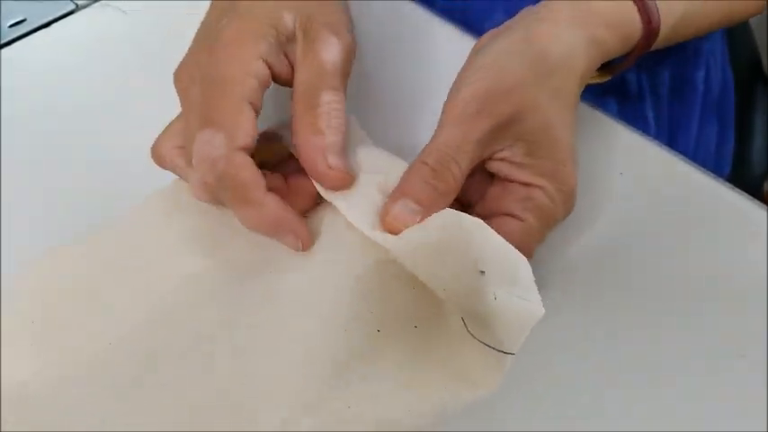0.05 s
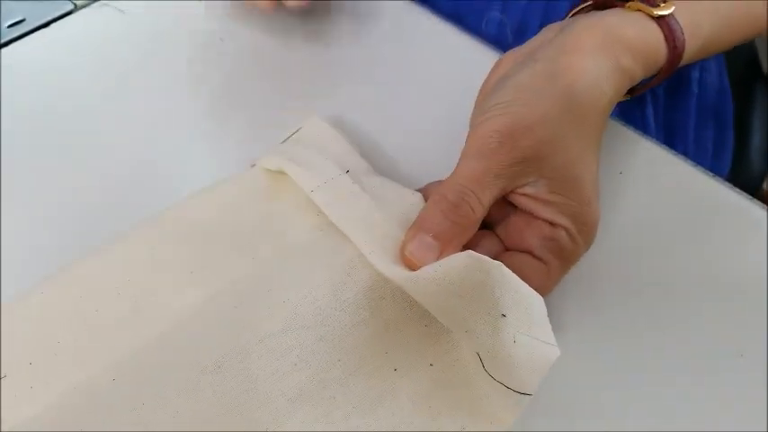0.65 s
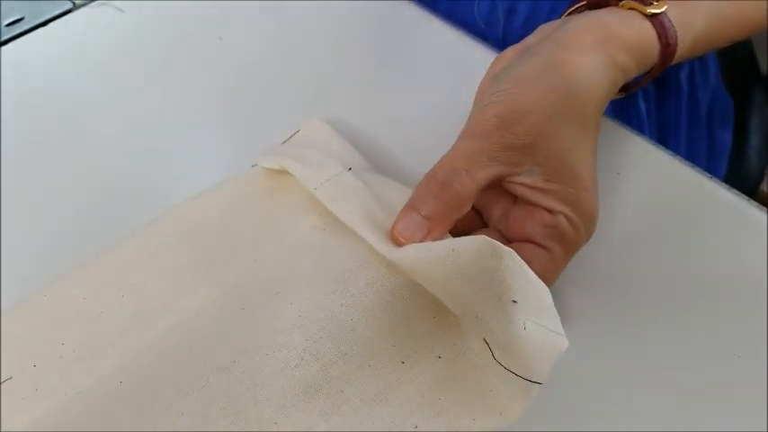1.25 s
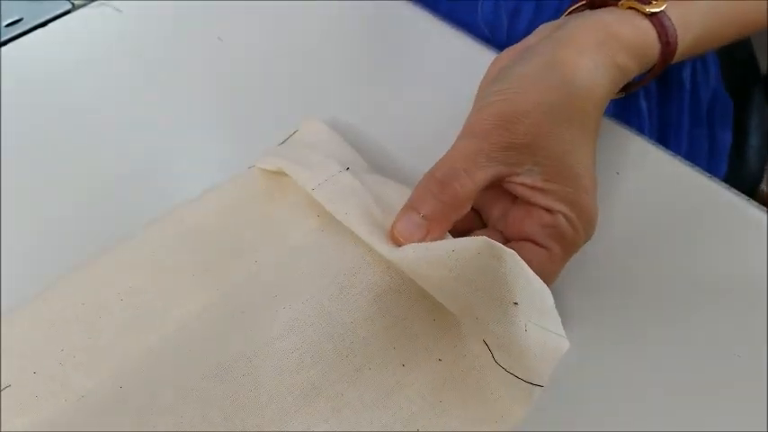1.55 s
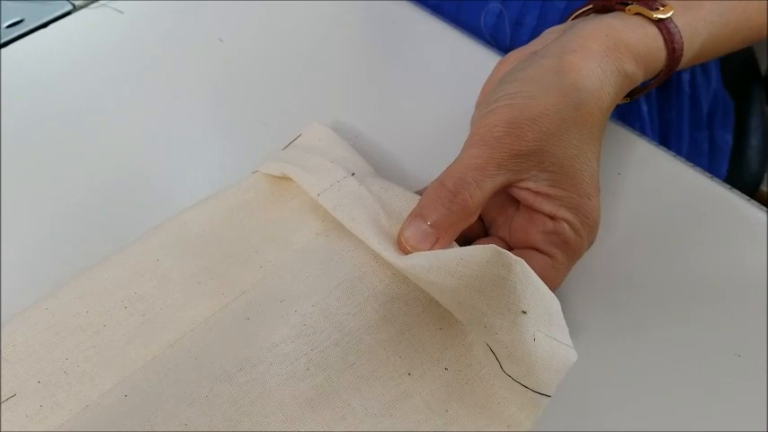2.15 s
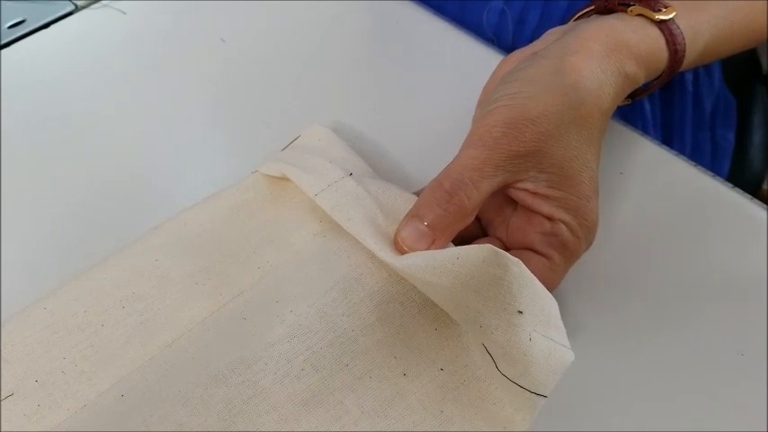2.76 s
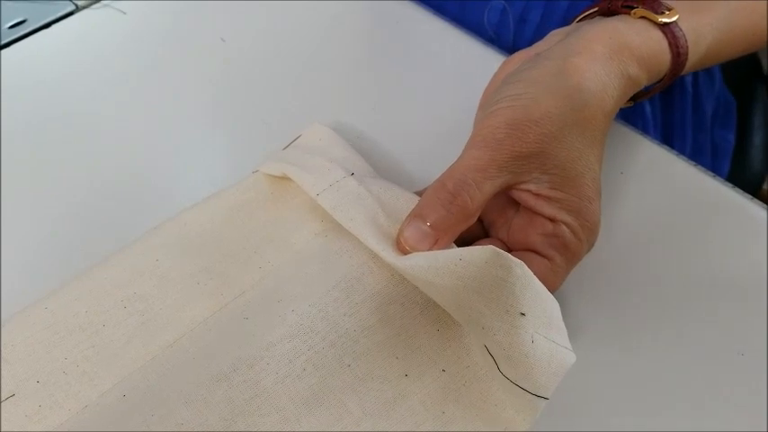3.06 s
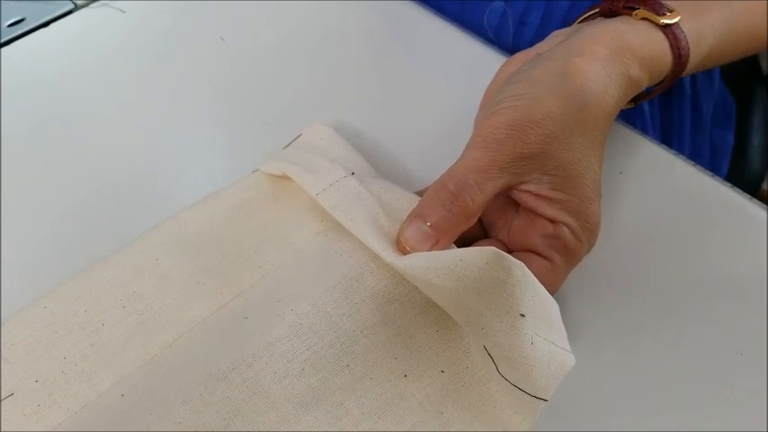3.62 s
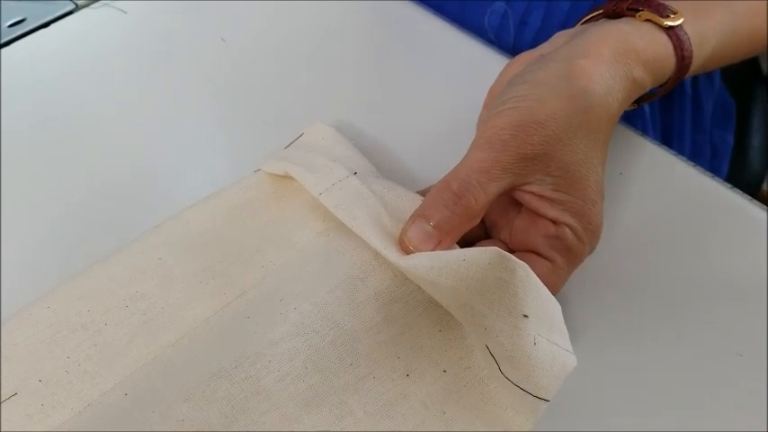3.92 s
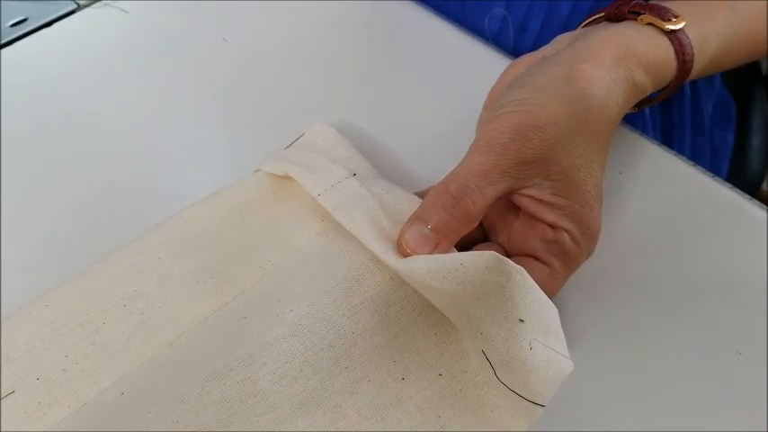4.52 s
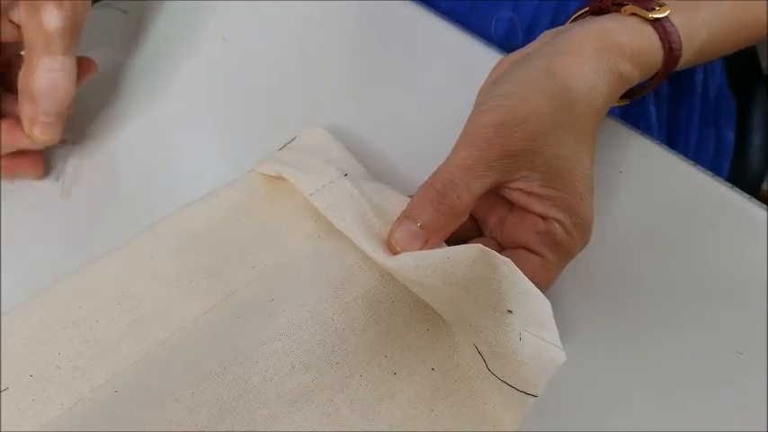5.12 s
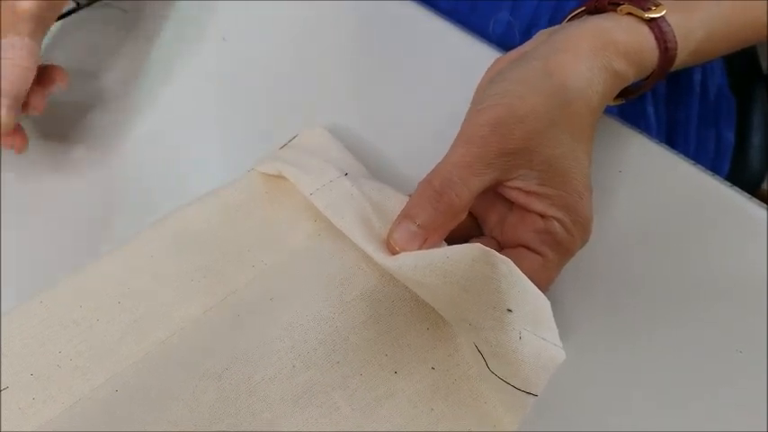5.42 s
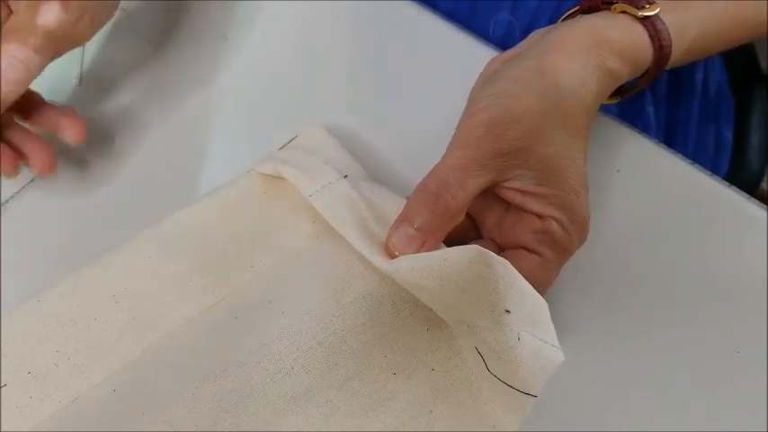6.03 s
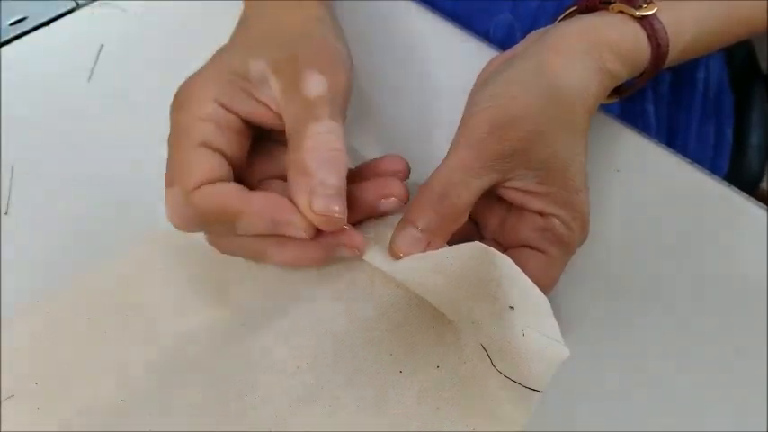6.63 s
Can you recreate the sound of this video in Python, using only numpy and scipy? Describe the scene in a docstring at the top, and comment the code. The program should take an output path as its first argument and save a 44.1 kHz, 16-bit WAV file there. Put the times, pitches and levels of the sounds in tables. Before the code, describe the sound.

Cotton cloth brushes softly over a work table. Fingers then rummage in a small box of pins, which click, slide and ring briefly in several uneven bursts. Afterwards a single pin is dragged across the tabletop with tiny ticks and a fine scrape. It is heard close up in stereo in a small room, with a low rumble, faint hum and hiss behind.

```python
"""Sewing at a work table in a small, bright room, heard close up on a stereo pair of microphones.
From the start a low rumble swells and fades behind a faint hum, hiss and thin whine.
Cotton cloth is shifted first, its threads brushing under the fingers. From 1.8 s the fingers rummage
in a small box of pins, which click, ring and slide over each other. From about 5 s one pin is
dragged over the table top, its tip catching in tiny ticks."""
import sys
import numpy as np
from scipy import signal
from scipy.fft import rfft, irfft, next_fast_len
from scipy.io import wavfile

SR = 44100
rng = np.random.default_rng(int(sys.argv[2]) if len(sys.argv) > 2 else 0)


def to_wav(sig):
    """Store sig (one row per channel, or 1-D mono) as 16-bit WAV at the path in sys.argv[1].

    Samples outside -1..1 are clipped; the rate is SR.
    """
    pcm = np.clip(np.atleast_2d(sig), -1, 1) * 32767
    pcm = np.round(pcm).astype(np.int16)
    wavfile.write(sys.argv[1], SR, pcm.T)  # frames by channels


N = 298961
TIME = np.arange(N) / SR
FREQ_HZ = np.fft.rfftfreq(N, 1 / SR)


def amp(db):
    return 10 ** (np.asarray(db) / 20)


def unit(x):
    """Scales to rms 1."""
    return x / np.sqrt(np.mean(x ** 2) + 1e-30)


def at_hz(points, hz):
    """Joins (freq_hz, value) points on a log-frequency axis."""
    f, value = np.transpose(points)
    return np.interp(np.log(hz + 1), np.log(f + 1), value)


def over_time(points):
    """Joins (time_s, value) points across the scene."""
    return np.interp(TIME, *np.transpose(points))


def add(mix, start_s, sound):
    part = mix[:, max(round(start_s * SR), 0):][:, :sound.shape[1]]
    part += sound[:, :part.shape[1]]


def colour(x, spectrum):
    """Causal filter of mean power 1 with the given spectrum."""
    log_gain = at_hz(spectrum, np.fft.rfftfreq(2048, 1 / SR)) * np.log(10) / 20
    mirrored = np.concatenate([log_gain, log_gain[-2:0:-1]])
    taps = np.fft.ifft(np.exp(np.conj(signal.hilbert(mirrored)))).real
    return signal.oaconvolve(x, taps[None] / np.linalg.norm(taps), axes=1)[:, :N]


def pair(z, likeness):
    """Makes two unrelated signals partly alike."""
    return np.array([z[0], likeness * z[0] + np.sqrt(1 - likeness ** 2) * z[1]])


def noise(gain, likeness):
    """Two channels of noise of rms 1, shaped by a gain per frequency."""
    return unit(irfft(pair(rfft(rng.standard_normal((2, N))), likeness) * gain, N))


def stroke(start_s, length_s, db, fade_s):
    """Gain of one movement of the hand: it swells, holds if long enough, and fades."""
    inside_s = np.minimum(TIME - start_s, start_s + length_s - TIME)
    edge_s = min(fade_s, length_s / 2)
    return amp(db) * np.sin(np.pi / 2 * np.clip(inside_s / edge_s, 0, 1)) ** 2


def grains(per_s, spread_db, decay_s):
    """A dense train of tiny contacts of uneven size, each a very short burst."""
    sizes = amp(spread_db * np.minimum(rng.exponential(1, N), 3))
    contacts = sizes * (rng.random(N) < per_s / SR)
    power = signal.lfilter([1], [1, -np.exp(-2 / (decay_s * SR))], contacts ** 2)
    return unit(np.sqrt(power) * pair(rng.standard_normal((2, N)), 0.16))


# Balance of sound arriving straight from the table: freq_hz, left_minus_right_db
DIRECT_BALANCE = [(1000, 4.5), (2500, -8.5), (4400, -10.5), (6500, -3.5), (8200, 16.5), (15000, 9.5)]

def to_mics(x, balance=DIRECT_BALANCE):
    """Shares each frequency between the left and right microphones."""
    size = next_fast_len(N, True)
    ratio = amp(at_hz(balance, np.fft.rfftfreq(size, 1 / SR)))
    gains = np.array([ratio, np.ones_like(ratio)]) * np.sqrt(2 / (1 + ratio ** 2))
    return irfft(rfft(x, size) * gains, size)[:, :N]


# Reverberation of the small room: freq_hz, t60_s
ROOM_DECAY = [(500, 0.47), (1200, 0.43), (2600, 0.34), (5500, 0.4), (8000, 0.33), (15000, 0.17)]
# Balance of its reflections at the microphones: freq_hz, left_minus_right_db
ROOM_BALANCE = [(1000, -1.5), (2500, -5.5), (4400, -5.5), (6500, -6), (8200, 10), (15000, 3.5)]

def room(x, build_s=0.0041, count=4, crossfades_per_s=90):
    """Diffuse reflections off near walls; the treble dies first.
    Several tails are blended in turn, so each click rings slightly differently."""
    hz, t, z = signal.stft(rng.standard_normal((count, 2, SR // 2)), SR, nperseg=256)
    tails = signal.istft(z * amp(-60 * t / at_hz(ROOM_DECAY, hz)[:, None]), SR, nperseg=256)[1]
    tails *= 1 - np.exp(-(np.arange(tails.shape[-1]) / SR / build_s) ** 2)
    tails /= np.linalg.norm(tails, axis=-1, keepdims=True)
    wet = 0
    for k, tail in enumerate(tails):
        share = np.sin(np.pi / 2 * np.minimum((TIME * crossfades_per_s - k) % count, 2))
        wet = wet + signal.oaconvolve(x[:1] * share, tail, axes=1)[:, :N]
    return to_mics(wet, ROOM_BALANCE)


# Hum in the room: pitch_hz, level_db
HUM_TONES = [(48.4, -70), (120, -68), (156, -76.5)]

def hum():
    """Faint steady tones, alike in both microphones."""
    return sum(amp(db) * np.sqrt(2) * np.sin(2 * np.pi * (hz * TIME + rng.random()))
               for hz, db in HUM_TONES)


# Self-noise of the microphones: freq_hz, gain_db
HISS_COLOUR = [(100, -5), (600, 0), (1000, -4), (2000, -6), (4300, -11.5), (5600, -10.5), (7500, -20.5),
               (9500, -18), (11500, -6.5), (12700, 2), (14000, -5), (16000, -5)]
# Course of the whine: time_s, pitch_hz
WHINE_PITCH = [(0, 12650), (.9, 12650), (1.5, 12900), (2, 12750), (3.4, 12880), (4.7, 12720), (5.6, 12720),
               (6.78, 12620)]

def hiss_and_whine(width_hz=80):
    """The microphones' own hiss, and a narrow, wandering band of noise heard as a thin whine."""
    hiss = amp(-72.5) * noise(amp(at_hz(HISS_COLOUR, FREQ_HZ)), likeness=0)
    cycles = np.cumsum(over_time(WHINE_PITCH)) / SR
    white = rng.standard_normal((2, N)) + 1j * rng.standard_normal((2, N))
    waver = signal.lfilter([1], [1, -np.exp(-np.pi * width_hz / SR)], white)
    whine = amp(-81) * unit((waver * np.exp(2j * np.pi * cycles)).real)
    return to_mics(hiss + whine, balance=[(1000, 0), (4500, 1.0), (8000, -2.5), (13000, 9)])


# Swells of the rumble's body, its top above 300 Hz and its depths below 90 Hz: time_s, relative_db
BODY_SWELL = [(0, -54.5), (.66, -49.5), (.83, -57), (1.0, -53), (1.3, -52.5), (1.7, -42), (2.3, -57.5),
              (2.87, -47), (3.0, -54), (3.08, -43.5), (3.25, -50.5), (3.38, -44), (3.85, -56.5),
              (4.15, -45.5), (4.44, -61.5), (4.62, -55.5), (5.63, -52.5), (5.77, -63), (6.3, -44.5),
              (6.78, -51.5)]
TOP_SWELL = [(0, -66), (.17, -73.5), (.47, -70.5), (.58, -63), (.85, -75.5), (1.11, -64.5), (1.75, -61),
             (2.3, -74), (2.82, -74), (3.08, -60.5), (3.75, -71), (4.23, -71.5), (4.44, -75.5), (5.98, -76),
             (6.22, -63.5), (6.78, -76.5)]
DEEP_SWELL = [(0, -68), (.35, -60), (.78, -61), (1.15, -70), (1.55, -59), (2.25, -58.5), (2.4, -62.5),
              (3.35, -59.5), (4.05, -63), (4.45, -66.5), (5.45, -63), (5.899, -67), (6.1, -60), (6.55, -56),
              (6.78, -55.5)]
# Broad colour of body and top, and colour of the depths: freq_hz, gain_db
BROAD_COLOUR = [(70, -29), (100, -15), (125, -5.5), (240, -2), (290, -12.5), (400, -24.5), (520, -27.5),
                (700, -41.5), (1000, -50.5), (2000, -95)]
DEEP_COLOUR = [(15, -28), (30, -37), (42, 18.5), (50, 14.5), (62, 17.5), (78, 5), (95, -1.5), (140, -47.5)]
# Resonances that boom in the rumble: centre_hz, width_hz, gain_db
BOOM_MODES = [(121.5, 24, 1.5), (157.5, 16.7, 5), (219.6, 22.3, 3), (233.8, 21, -6), (266, 22, -7),
              (328.3, 6.1, -13), (401, 22, -27)]

def rumble(wander_db=1.8, wander_step_s=.1):
    """Low noise in the room booms in fixed resonances, swelling and fading; its deep part wanders."""
    booms = sum(amp(db) ** 2 / (1 + (2 * (FREQ_HZ - hz) / width) ** 2) ** 2
                for hz, width, db in BOOM_MODES)
    gain = np.sqrt(amp(at_hz(BROAD_COLOUR, FREQ_HZ) - 7.0) ** 2 + booms)
    likeness = at_hz([(130, 0.92), (290, 0.86), (640, 0.28), (1200, 0.29)], FREQ_HZ)
    top_share = np.clip((FREQ_HZ - 280) / 80, 0, 1)
    body = amp(over_time(BODY_SWELL) - 2.03) * noise(gain * np.sqrt(1 - top_share), likeness)
    top = amp(over_time(TOP_SWELL) + 2) * noise(gain * np.sqrt(top_share), likeness)
    wander = unit(np.interp(TIME / wander_step_s, np.arange(512), rng.standard_normal(512)))
    deep_db = over_time(DEEP_SWELL) + wander_db * wander
    deep = amp(deep_db) * noise(amp(at_hz(DEEP_COLOUR, FREQ_HZ)), likeness=0.7)
    balance = [(50, 5.5), (120, 1.0), (220, 0.5), (400, -2.5), (700, -3.0)]
    return to_mics(body + top + deep, balance)


# Rubs of the cloth on the table: start_s, length_s, relative_db
CLOTH_RUBS = [(-.08, 0.21, -68.5), (0.052, 0.36, -64.5), (0.374, 0.2, -68), (0.673, .25, -77),
              (1.042, 0.21, -73), (1.794, 0.093, -73)]
# Colour of the cotton: freq_hz, gain_db
COTTON_COLOUR = [(800, -6), (2800, -12), (3700, -3), (5800, 1.5), (7500, -9), (10500, -2), (13000, 1),
                 (16000, 2.5)]

def cloth():
    """Threads of the weave brush over skin and table, each rub swelling and dying away."""
    threads = grains(per_s=2200, spread_db=2, decay_s=.0015)
    rubbing = sum(stroke(*rub, fade_s=0.17) for rub in CLOTH_RUBS)
    rustle = colour(rubbing * threads, COTTON_COLOUR)
    return amp(-1.0) * to_mics(rustle) + amp(-2.0) * room(rustle)


def tip_tick(rise_s=.00025, decay_s=.0009):
    """One slip of a pin's tip: a burst of noise with the energy of 5 ms at level 1."""
    t = np.arange(600) / SR
    white = pair(rng.standard_normal((2, len(t))), .25)
    burst = white * (1 - np.exp(-t / rise_s)) ** 2 * np.exp(-t / decay_s)
    return unit(burst) * np.sqrt(.005 / t[-1])


# Hard catches of the tip on the table top: start_s, relative_db
TIP_CATCHES = [(5.0627, -62), (5.0766, -63), (5.1177, -56), (5.128, -45.5), (5.1887, -51), (5.2186, -56),
               (5.242, -48.5), (5.2474, -60), (5.2805, -54), (5.3016, -56), (5.6161, -50), (6.0028, -44.5),
               (6.0268, -48), (6.0745, -56)]
# The pin's course over the table: time_s, scrape_relative_db, slip_relative_db
DRAG_COURSE = [(5.12, -77, -63), (5.27, -78, -60), (5.33, -63, -57), (5.52, -65, -66.5), (5.85, -65, -73),
               (6.04, -65, -74), (6.1, -62, -55), (6.22, -65.5, -66.5), (6.34, -84.5, -79)]
# Colours of the ticks and of the scrape between them: freq_hz, gain_db
TICK_COLOUR = [(1000, -26.5), (2800, -22.5), (3500, -22), (4400, -7), (5700, -4), (7000, -10.5),
               (8500, -13), (10500, -5), (13200, -2.5), (14200, -3.5), (16000, -1.5)]
SCRAPE_COLOUR = [(1000, -25), (3700, -14), (4500, -5), (5700, -4), (7000, -9.5), (8700, -19), (10500, -3),
                 (13300, -1), (14300, -2), (16000, 5)]

def dragged_pin(slips_per_s=100, jitter_steps=.4, spread_db=0.8):
    """The tip sticks and slips: a few hard catches and a run of small, uneven slips over a fine scrape."""
    time_s, scrape_db, slip_db = np.transpose(DRAG_COURSE)
    steps_s = np.arange(time_s[0], time_s[-1], 1 / slips_per_s)
    late, size = rng.standard_normal((len(steps_s), 2)).T
    slips = zip(steps_s + jitter_steps * late / slips_per_s,
                np.interp(steps_s, time_s, slip_db) + spread_db * size)
    ticks = np.zeros((2, N))
    for start_s, db in [*TIP_CATCHES, *slips]:
        add(ticks, start_s, amp(db + 1.5) * tip_tick())
    grit = grains(per_s=2400, spread_db=2.5, decay_s=.0012)
    scrape = amp(np.interp(TIME, time_s, scrape_db, left=-np.inf, right=-np.inf) + 1.0) * grit
    drag = colour(ticks, TICK_COLOUR) + colour(scrape, SCRAPE_COLOUR)
    return to_mics(drag) + amp(-4.5) * room(drag)


def radiate(x, low_hz, walls_db, q=1.51):
    """Pins sound from their lowest resonance upward; the box walls add the range below it."""
    omega = 2 * SR * np.tan(np.pi * low_hz / SR)
    resonance = signal.bilinear([1, 0, 0], [1, omega / q, omega ** 2], SR)
    low_cut = signal.butter(4, low_hz * .85, "high", fs=SR)
    pins = signal.lfilter(*low_cut, signal.lfilter(*resonance, x))
    walls = signal.sosfilt(signal.butter(2, 1700, fs=SR, output="sos"), x)
    return pins + amp(walls_db) * walls


def knock(db, tilt_db, decay_s, low_hz, scrape_db, lead_s, rise_s=0.0011, scrape_s=0.0044):
    """Pins scrape for a moment, then collide with each other and with the box walls."""
    t = np.arange(8192) / SR - lead_s
    after_s = np.maximum(t, 0)
    blow = (1 - np.exp(-after_s / rise_s)) ** 2 * np.exp(-after_s / decay_s)
    envelope = blow / blow.max() + amp(scrape_db) * np.exp(-abs(t) / scrape_s)
    walls_db = -7.5 - 10 * np.log2(low_hz / 2466)  # the deeper the pins, the more the walls join in
    clatter = radiate(envelope * pair(rng.standard_normal((2, len(t))), 0.19), low_hz, walls_db)
    slope = at_hz([(4000, -.5), (12000, .5)], np.fft.rfftfreq(len(t), 1 / SR))
    tilted = irfft(rfft(clatter) * amp(tilt_db * slope))
    return amp(db) * unit(tilted) * np.sqrt(.005 * SR / len(t))  # energy of 5 ms at this level


# Modes of the pins: pitch_hz, relative_db, t60_s
RING_MODES = [(3605, 0, .06), (4925, -7, .1), (6175, -1, .11), (6240, -2, .11), (7800, -6, .07),
              (9652, -2, .07), (10232, 0, .07), (11800, -3, .06), (12175, -2, .07)]

def ringing(samples, room_t60_s=0.21, rise_s=0.0005):
    """The pins' modes die fast in the box, and the room holds them a little longer."""
    t = np.arange(samples) / SR
    hz, db, t60_s = np.transpose(RING_MODES)[:, :, None]
    phase = 2 * np.pi * rng.random((2, len(RING_MODES), 1))
    fade = (amp(-60 * t / t60_s) + amp(-7 - 60 * t / room_t60_s)) * (1 - np.exp(-t / rise_s))
    return unit((amp(db) * fade * np.sin(2 * np.pi * hz * t + phase)).sum(1))


# Knocks in the box, close to the microphones:
# time_s, relative_db, treble_tilt_db, decay_s, ring_share, lowest_resonance_hz, scrape_re_blow_db
PIN_KNOCKS = [(1.877, -59.5, -7, 0.0007, 0, 5150, -6), (1.954, -48, 7.5, .0027, 0.07, 3180, -26),
              (1.9947, -49, -9, .0025, .15, 2520, -3), (2.014, -48, 4, 0.0011, 0, 2480, -8),
              (2.0298, -43, 12, .0015, 0.06, 3100, -10), (2.059, -38, 8, 0.0017, 0.17, 2880, -25),
              (2.178, -48, 6, 0.0012, 0.04, 3140, -8), (2.222, -47.5, 6.5, 0.0029, 0.04, 2530, -16),
              (2.2632, -38, 9.5, .0013, .1, 2940, -26), (2.4399, -42.5, 2, 0.0045, .2, 3700, -20),
              (2.4573, -38.5, 14, 0.0022, 0.16, 2700, -9), (2.4698, -32.5, 14, 0.0017, 0, 2950, -17),
              (2.5055, -25.5, 4, 0.0034, 0.3, 2870, -11), (2.512, -31.5, 3, 0.00076, 0.52, 2220, -20),
              (2.7987, -47.5, 3.5, 0.0031, 0.1, 2650, -16), (2.8231, -38.5, 6, 0.0013, 0.1, 2900, -18),
              (2.833, -39, 4, 0.0034, .05, 2440, -8), (2.873, -40, -9.5, 0.0039, 0.6, 2320, -8),
              (2.9068, -25, 10, 0.00076, 0, 2800, -8), (3.022, -44, 9, 0.0018, 0.25, 3720, -18),
              (3.0668, -36.5, 5, 0.0027, 0.05, 3850, -17), (3.1237, -46.5, 4, 0.0035, 0.5, 3900, -12),
              (3.1911, -35.5, -3, 0.0017, 0.1, 3900, -31), (3.5083, -28.5, 14, 0.0024, 0, 2500, -31),
              (3.527, -39.5, 0, 0.0012, 0, 2300, -10), (3.858, -50.5, -7, 0.0017, 0.07, 3140, -12),
              (3.9191, -47.5, -13.5, 0.00061, 0.14, 2800, -28), (4.0781, -41, 2.5, .002, 0, 2610, -2),
              (4.094, -43.5, -5, 0.003, 0.34, 2620, -9), (4.1724, -38.5, 1.5, 0.0034, 0, 2800, -13),
              (4.1899, -43.5, -8.5, 0.00042, 0.06, 2770, -20), (4.2233, -39.5, 3, 0.0022, 0, 2650, -17),
              (4.2345, -39.5, -4.5, 0.0013, 0.24, 2600, -12), (4.2665, -29, -0.5, 0.0015, 0, 2440, -15),
              (4.284, -43.5, -6, 0.0042, 0.6, 2340, -11), (4.332, -35, 0.5, 0.0018, 0, 2470, -20),
              (4.4388, -45.5, 7, 0.00079, 0.06, 2730, -20)]
# Fingers stir the heap: start_s, length_s, relative_db
HEAP_STIRS = [(1.82, 0.39, -70.5), (2.145, 0.22, -57), (2.44, 0.13, -61), (2.762, 0.23, -53.5),
              (3.036, 0.16, -60), (3.734, 0.34, -60), (4.186, 0.24, -47.5)]
# Colour of the pins in their box: freq_hz, gain_db
BOX_COLOUR = [(400, -36.5), (800, -17.5), (1000, -5.5), (1200, 0), (1550, -9), (2050, -7), (2750, -5.5),
              (4200, -6.5), (5900, 0), (7000, -8.5), (8500, -10), (10000, -3), (12000, -2.5), (16000, -1.5)]

def pin_box(lead_s=.015):
    """Each knock is a clatter of a few pins, most ringing briefly; between knocks the heap slides."""
    knocks, sent = np.zeros((2, 2, N))
    for time_s, db, tilt_db, decay_s, ring_share, low_hz, scrape_db in PIN_KNOCKS:
        clatter = knock(db, tilt_db, decay_s, low_hz, scrape_db, lead_s)
        add(knocks, time_s - lead_s, np.sqrt(1 - ring_share) * clatter)
        add(knocks, time_s, np.sqrt(ring_share) * clatter.std() * ringing(clatter.shape[1]))
        # Soft knocks lie deep in the heap and reach the microphones more by way of the room.
        send_db = -0.0534 * (db + 40.5)
        add(sent, time_s - lead_s, amp(send_db) * np.sqrt(1 - ring_share / 2) * clatter)
    stirring = sum(stroke(*stir, fade_s=0.046) for stir in HEAP_STIRS)
    contacts = grains(per_s=1900, spread_db=5, decay_s=.001)
    slide = stirring * radiate(contacts, low_hz=2100, walls_db=-18.5)
    direct = amp(0.5) * knocks + amp(-3.5) * slide
    to_room = amp(2.1) * sent + amp(-4.0) * slide
    return to_mics(colour(direct, BOX_COLOUR)) + room(colour(to_room, BOX_COLOUR))


def scene():
    """The work on the table in front, the room's rumble and faint noises behind."""
    return pin_box() + dragged_pin() + cloth() + rumble() + hum() + hiss_and_whine()


def record(dry):
    """The recorder starts and stops softly, and cuts the treble above 15.9 kHz."""
    eased = dry * signal.windows.tukey(N, .001)
    low_pass = signal.firwin(301, 15900, window=("kaiser", 9), fs=SR)
    return signal.oaconvolve(eased, low_pass[None], "same")


dry = scene()
out = record(dry)
to_wav(out)
```